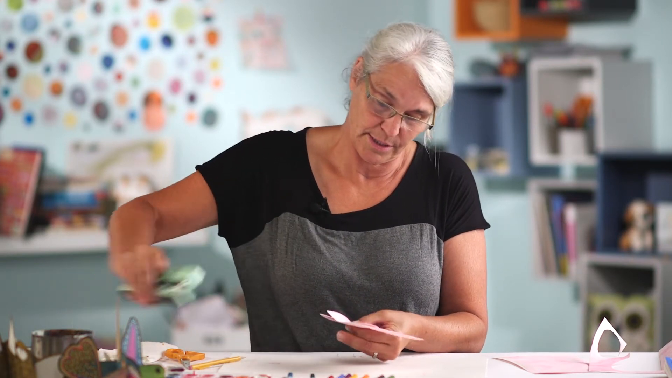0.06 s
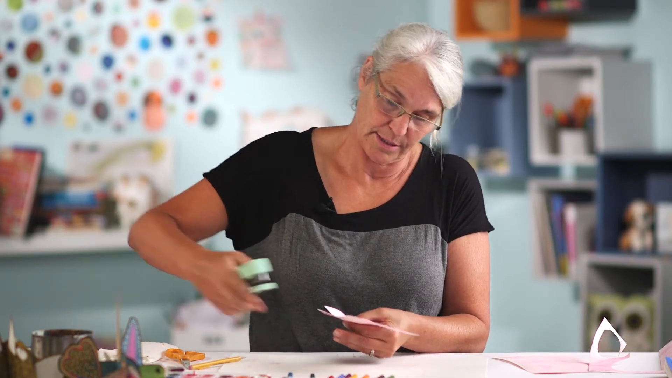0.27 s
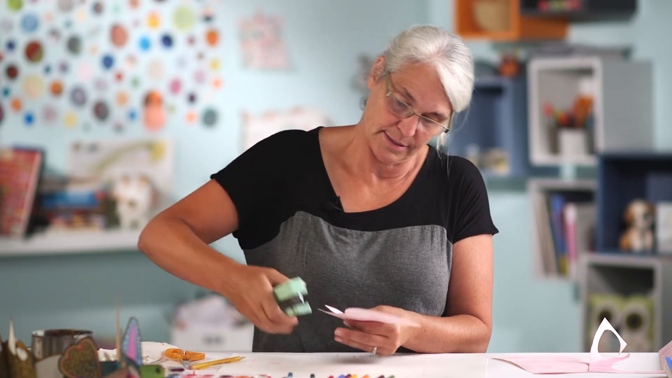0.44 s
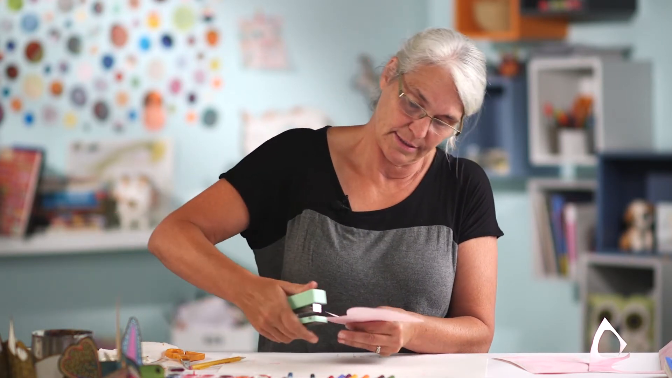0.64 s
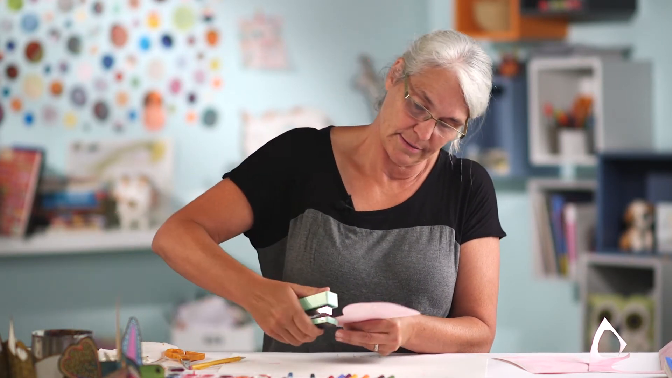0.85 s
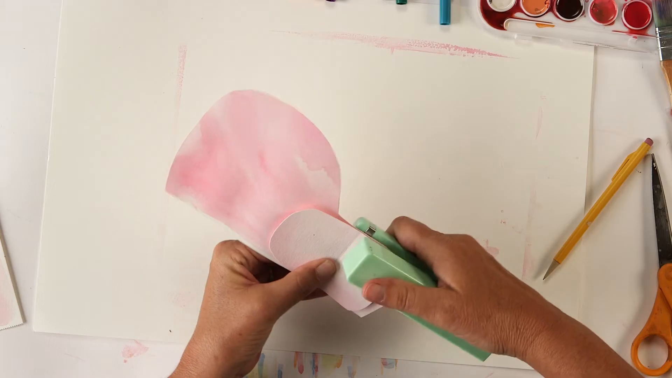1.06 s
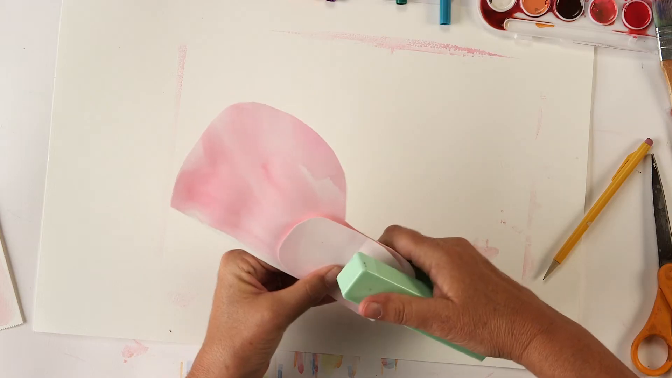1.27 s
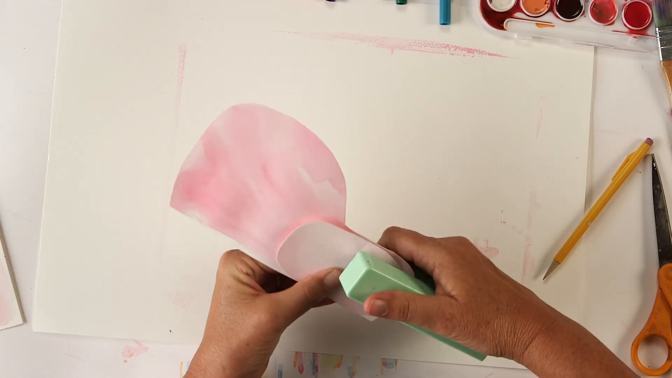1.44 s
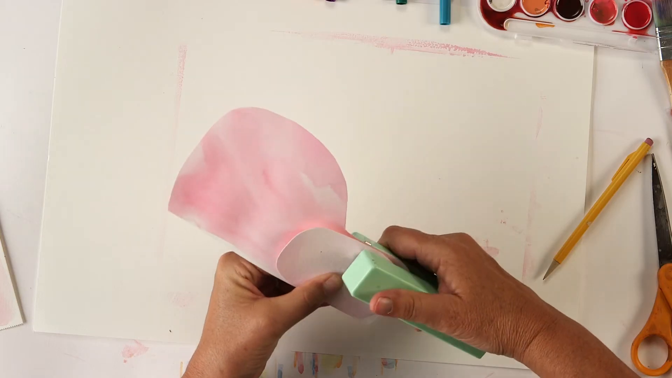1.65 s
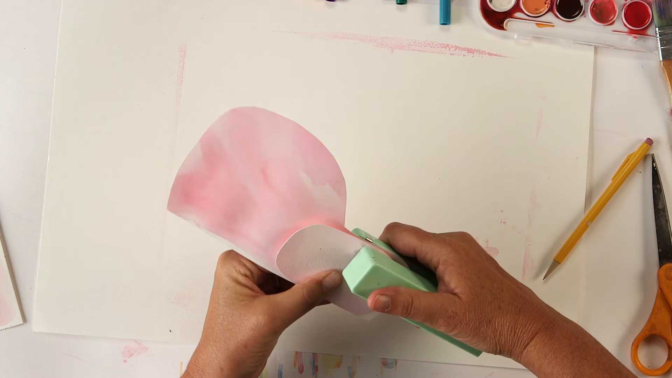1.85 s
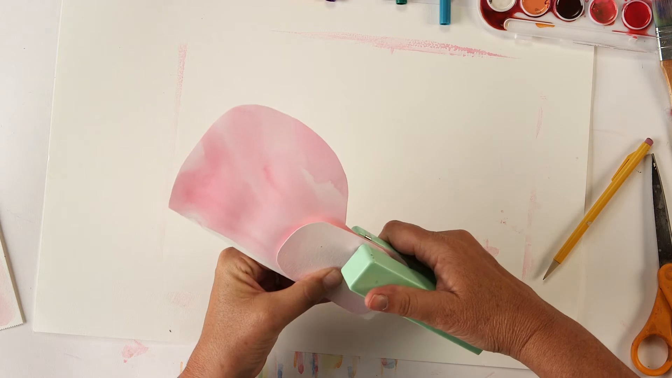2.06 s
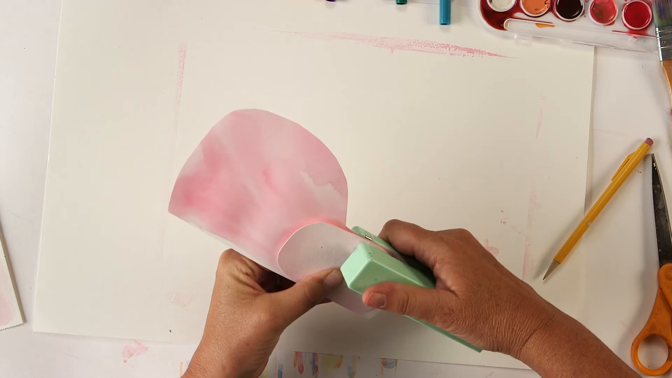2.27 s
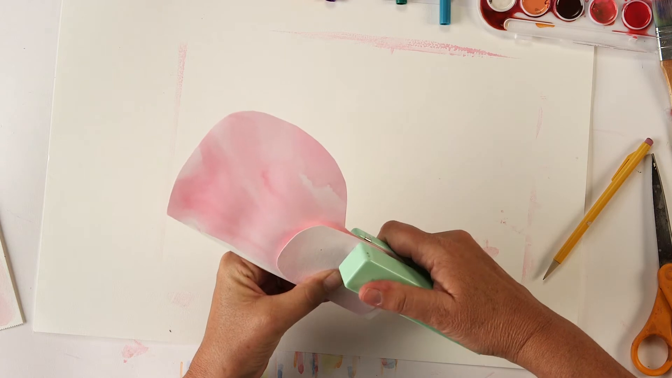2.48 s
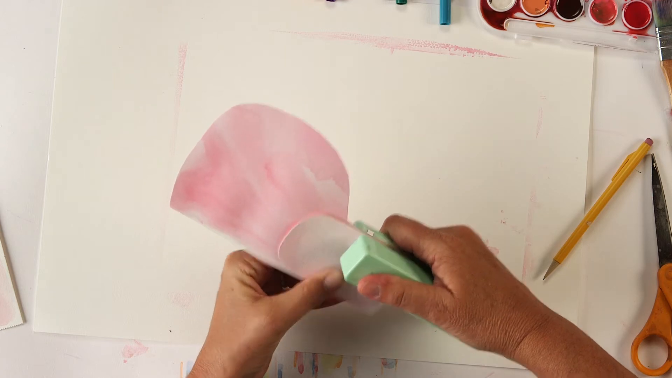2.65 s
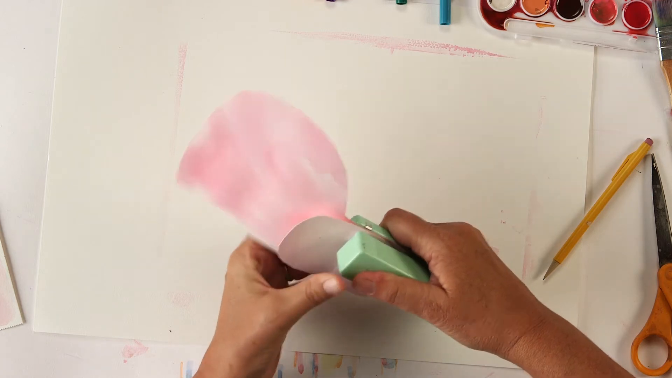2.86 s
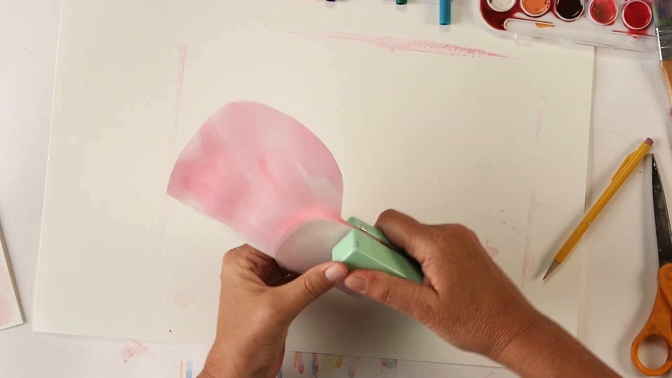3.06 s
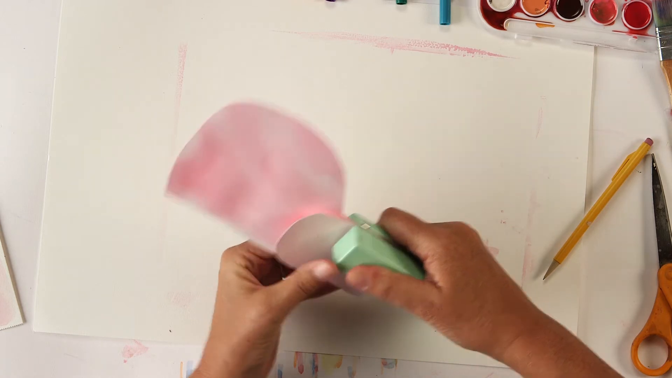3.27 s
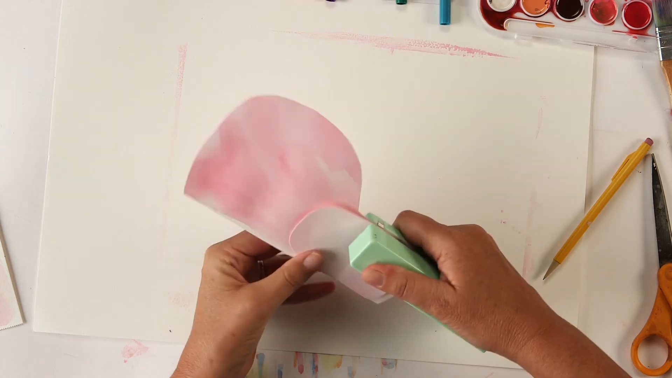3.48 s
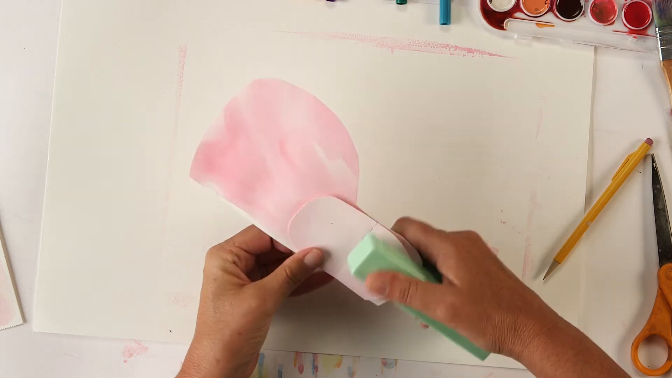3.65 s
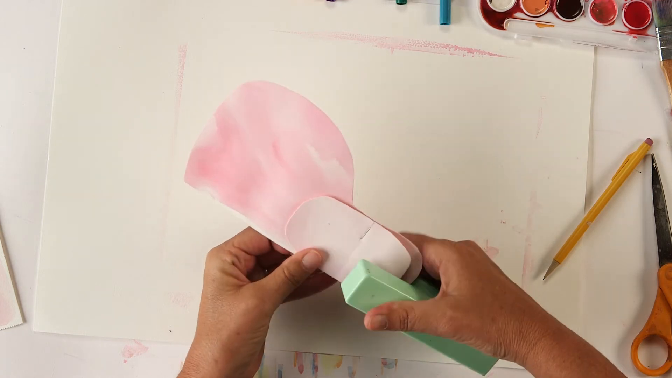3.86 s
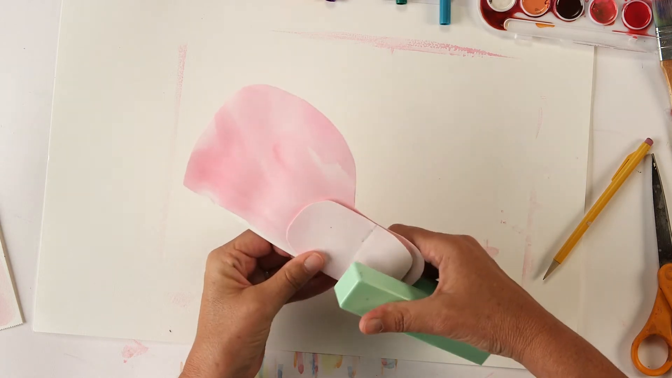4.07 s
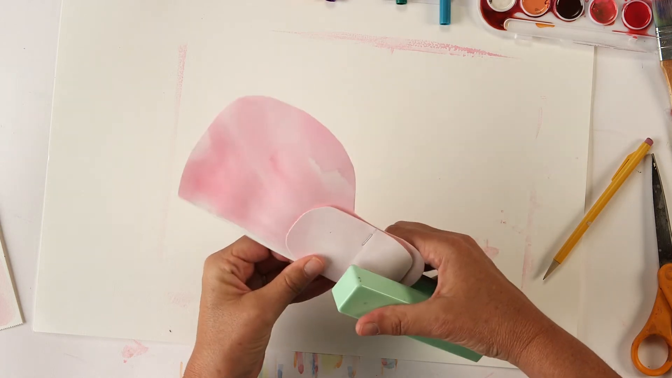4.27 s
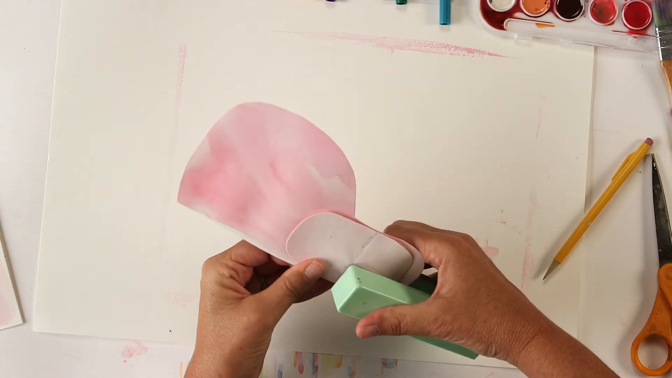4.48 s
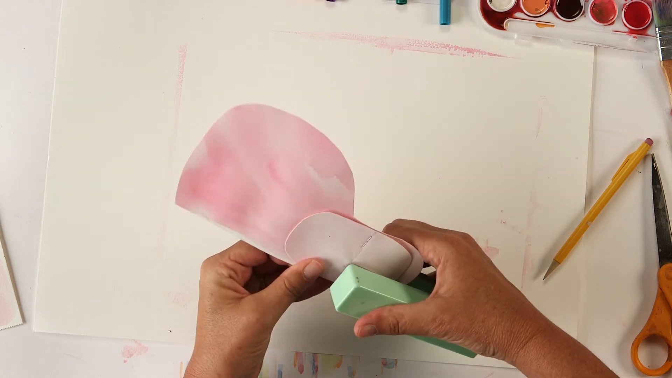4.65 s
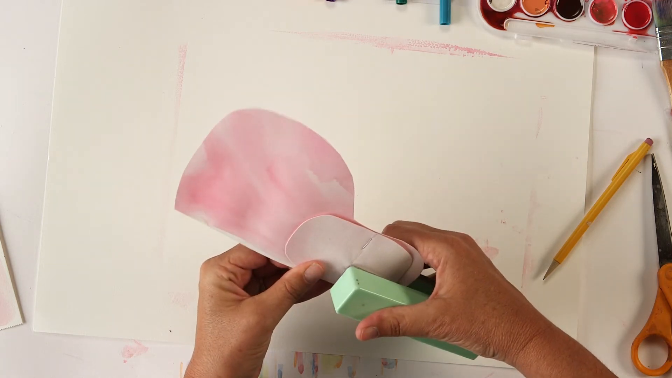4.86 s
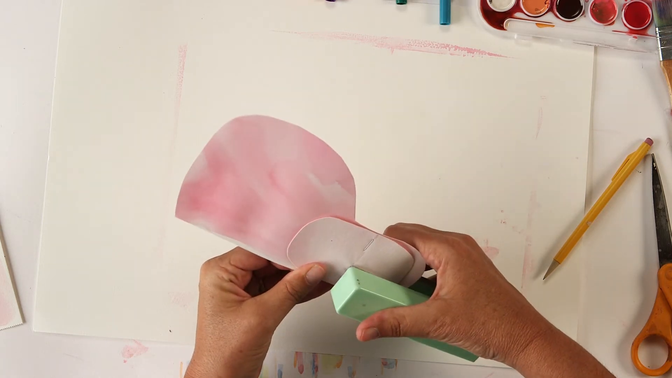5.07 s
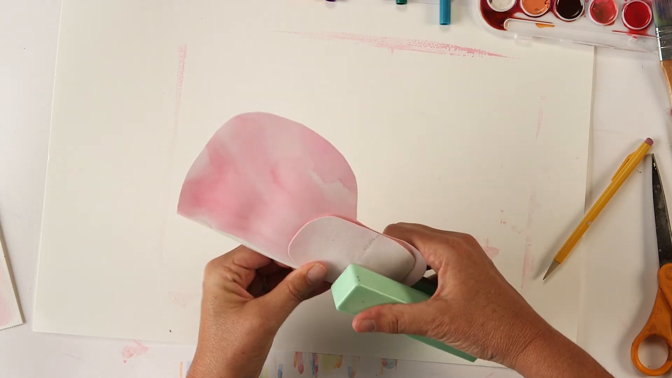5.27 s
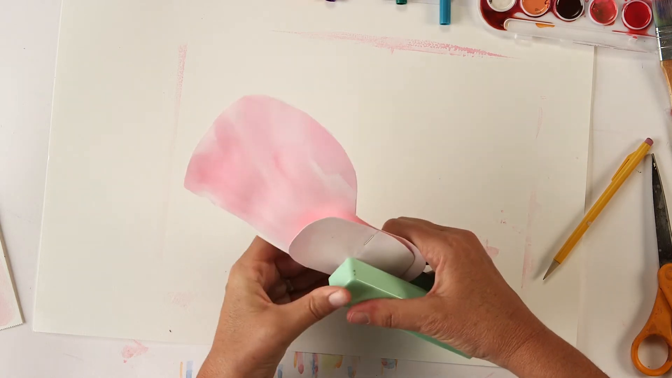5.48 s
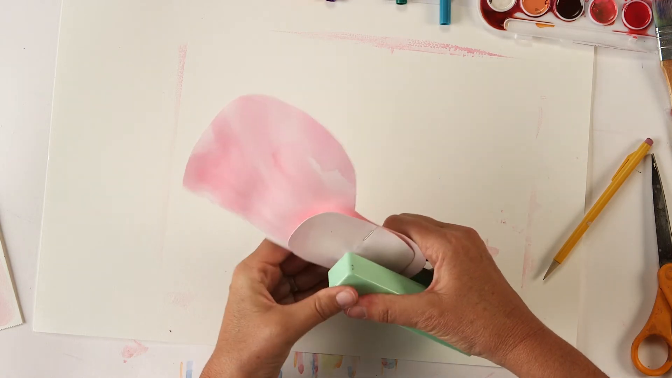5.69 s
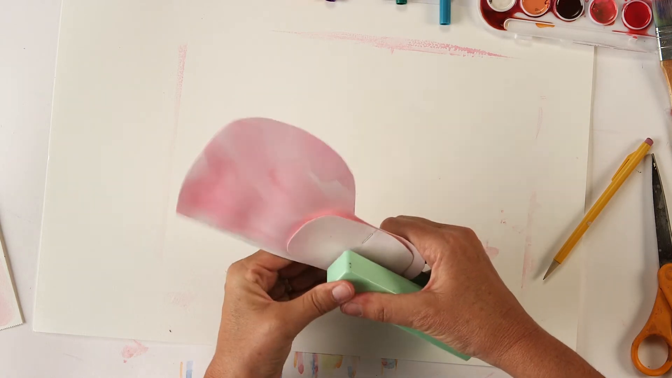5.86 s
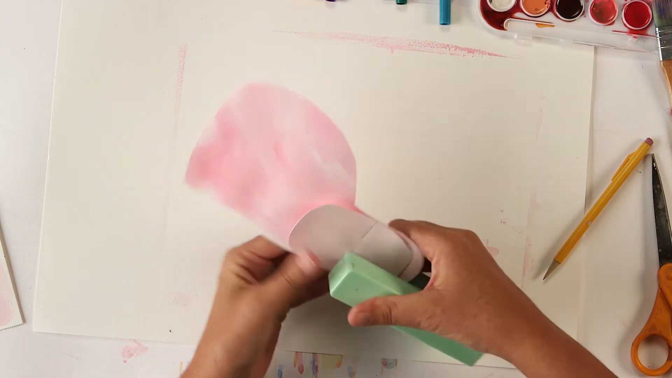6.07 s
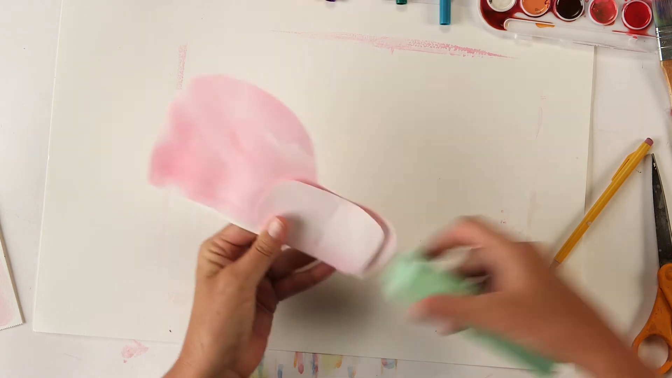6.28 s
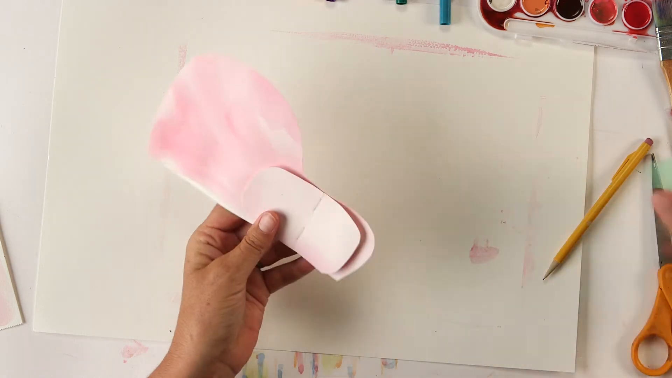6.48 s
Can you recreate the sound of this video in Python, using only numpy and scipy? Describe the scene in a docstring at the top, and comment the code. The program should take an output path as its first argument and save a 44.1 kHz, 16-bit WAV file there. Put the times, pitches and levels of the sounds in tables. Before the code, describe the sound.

A small hand stapler rattles as it is picked up, rubs over folded paper, then clacks hard twice in a small quiet room.

```python
"""A small hand stapler rattles as it is picked up, then slides over folded paper and is squeezed twice.
Each contact is a short push that cracks as noise and rings damped body modes, set in level band by band.
The staple strip shivers as sparse impulses through steel modes; the paper rubs as grainy, coloured noise.
A small quiet room answers with decaying noise; a close clip-on microphone flattens the loudest clacks."""
import sys
import numpy as np
from scipy import signal
from scipy.fft import rfft, irfft, next_fast_len
from scipy.io import wavfile
from scipy.ndimage import map_coordinates

SR = 44100
rng = np.random.default_rng(int(sys.argv[2]) if len(sys.argv) > 2 else 0)


def unload_wav(signal):
    """Save mono or channel-first audio to the path in sys.argv[1] as 16-bit WAV at rate SR, clipped to [-1, 1]."""
    wavfile.write(
        sys.argv[1],
        SR,
        np.round(np.clip(np.atleast_2d(signal).T, -1, 1) * 32767).astype(np.int16),
    )


N = 287752

# knocks of loose steel parts, levels relative: start_s, level_db, brightness_db, part_hz, part_db
KNOCKS = [(0.05, -36, -5, 4580, 6.5), (.121, -36, -7, 1650, -10), (0.129, -39, -2, 2280, 12),
          (.147, -38, -18, 3950, 0), (.159, -37.5, 2, 1550, 14), (.222, -23, -31, 2460, -2),
          (0.253, -29.5, -6, 5160, 7), (0.301, -36.5, -7, 6900, 4), (0.342, -31, -15, 1570, 10),
          (0.349, -22.5, -17, 5460, 14), (.359, -29, 0, 6630, 7), (.433, -31, -12.5, 5340, 15.5),
          (0.454, -43, -15, 2200, -9), (0.516, -43.5, -14, 2930, 0), (.584, -32.5, -3.5, 2760, -6),
          (0.598, -34.5, -16, 2840, 0), (0.876, -40.5, -13, 4050, 9)]
# band edges of a light contact (low, middle, bright): edge_hz
LIGHT_EDGES = [300, 1300, 6000, 15000]
# light contact: time to the peak of the push; ring time of the struck part, damped by the hand
SOFT_CONTACT_S, HELD_T60_S = 0.0007, 0.022


def amp(db):
    """Decibels to gain."""
    return 10 ** (np.asarray(db) / 20)


def unit(x):
    """x at rms 1."""
    return x / np.sqrt(np.mean(x ** 2) + 1e-20)


def along(points, hz):
    """(Hz, value) points joined on a log frequency axis."""
    point_hz, value = np.transpose(points)
    return np.interp(np.log(hz + 1), np.log(point_hz + 1), value)


def filtered(x, response):
    """x times a response of frequency, zero-padded against wrap-around."""
    size = next_fast_len(len(x) + SR // 4)
    hz = np.fft.rfftfreq(size, 1 / SR)
    return irfft(rfft(x, size) * response(hz), size)[:len(x)]


def coloured(x, spectrum):
    """x shaped by (Hz, dB) points, at rms 1."""
    return unit(filtered(x, lambda hz: amp(along(spectrum, hz))))


def wobble(knots_per_s):
    """Smooth random curve: a spline through random knots."""
    knots = rng.standard_normal(int(N * knots_per_s / SR) + 4)
    return map_coordinates(knots, [np.arange(N) * knots_per_s / SR])


def resonance(hz, centre_hz, width_hz):
    """Response of one damped mode, 1 at its centre."""
    return 1j * hz * width_hz / (centre_hz ** 2 - hz * hz + 1j * hz * width_hz)


def add(track, start_s, sound):
    """Mix a sound into the track at start_s."""
    start = round(start_s * SR)
    track[start:start + len(sound)] += sound[:N - start]


def voiced(blow, edges_hz, levels_db):
    """Where a blow lands sets its band levels; a minimum-phase filter keeps the colour from leading it."""
    n = len(blow)
    hz, spectrum = np.fft.rfftfreq(n, 1 / SR), rfft(blow)
    # energy counted as power over 5 ms
    power = 2 * np.abs(spectrum) ** 2 / n / (SR * 0.005)
    tone = []
    for low_hz, high_hz, db in zip(edges_hz, edges_hz[1:], levels_db):
        band_power = power[(hz >= low_hz) & (hz < high_hz)].sum()
        tone.append((np.sqrt(low_hz * high_hz), db - 10 * np.log10(band_power)))
    # fold the cepstrum to its causal half: minimum phase
    cepstrum = irfft(np.log(amp(along(tone, hz))), n)
    cepstrum[1:n // 2] *= 2
    cepstrum[n // 2:] = 0
    return irfft(spectrum * np.exp(rfft(cepstrum)), n)


def strike(contact_s, crack_db, tail_db, tail_t60_s, part_hz, part_db, part_t60_s):
    """A push cracks, rings body modes and the struck part; a fainter noise tail dies away after it."""
    # stapler body modes: centre_hz, width_hz, level_db
    body_modes = [(380, 1400, -6.5), (639, 220, -7), (1033, 330, -13), (1365, 90, -9), (1458, 190, -4.5),
                  (1588, 110, -9.5), (1975, 140, -4.5), (2153, 110, -6), (2745, 160, -7.5), (3168, 150, -5),
                  (4036, 70, -13.5), (4810, 400, -10.5), (5293, 170, -4.5), (6760, 120, -8.5),
                  (7600, 200, -5), (8320, 340, -3), (9580, 290, -8.5)]
    t = np.arange(int(SR * 0.6) // 2 * 2) / SR
    push = t / contact_s * np.exp(1 - t / contact_s)
    onset = 1 - np.exp(-t / contact_s)

    def sine(hz):
        """Sine at random phase, detuned about 1 %."""
        return np.sin(2 * np.pi * (hz * (1 + 0.01 * rng.normal()) * t + rng.random()))

    ring = onset * amp(part_db - 60 * t / part_t60_s) * sine(part_hz)
    for hz, width_hz, db in body_modes:
        # the push charges a leaky mode
        swell = signal.lfilter([1], [1, -np.exp(-np.pi * width_hz / SR)], push + 1e-20)
        ring += amp(db + 0.32 * rng.normal()) * swell / swell.max() * sine(hz)
    noise_level = amp(crack_db) * push + amp(tail_db - 60 * t / tail_t60_s) * onset
    # plastic softens the very top of the noise
    softening = signal.butter(2, 11500, fs=SR)
    noise = signal.lfilter(*softening, rng.standard_normal(len(t)))
    return ring + noise_level * noise


def room(x):
    """Diffuse wall answer: noise builds up within milliseconds and decays at a rate set by frequency."""
    # decay times: centre_hz, t60_s
    decay = [(150, 0.15), (500, .44), (1200, 0.47), (3000, 0.4), (7000, 0.42), (14000, 0.18)]
    # reflected colour: centre_hz, level_db
    wall_colour = [(100, -13), (300, -0.5), (600, -2.5), (780, 2), (1050, 0.5), (1750, -2.5), (3100, -1.5),
                   (6000, -7.5), (14000, -3)]
    hz, t, z = signal.stft(rng.standard_normal(int(SR * 0.6)), SR, nperseg=256)
    buildup = 1 - np.exp(-t / 0.0025)
    fade = amp(-60 * t / along(decay, hz)[:, None]) * buildup
    tail = signal.istft(z * fade, SR, nperseg=256)[1]
    wet = signal.fftconvolve(x, tail / np.linalg.norm(tail))[:len(x)]
    return filtered(wet, lambda f: amp(along(wall_colour, f)))


def still_air():
    """Faint rumble and hiss of the room: steady coloured noise."""
    # relative density: centre_hz, level_db_per_hz
    air_spectrum = [(12, -29.5), (20, 0), (59, -7), (112, -7.5), (175, -12), (464, -22), (505, -19),
                    (667, -23), (1010, -26), (2210, -34.5), (3750, -32.5), (6180, -36.5), (10500, -38),
                    (15500, -41.5)]
    return amp(-56) * coloured(rng.standard_normal(N), air_spectrum)


def paper():
    """Fibres catch and slip: a grainy rub and finer hiss swell and fade with each stroke's speed."""
    # relative densities: centre_hz, level_db_per_hz
    rub_spectrum = [(240, -23), (400, 4.5), (1190, -8.5), (1420, -7), (2090, -3.5), (2620, -7),
                    (4670, -2.5), (8000, -21), (10400, -49), (17600, -120)]
    hiss_spectrum = [(2500, -23), (6000, 4.5), (10000, 3), (15500, -4)]
    # slides under fingers and jaws: start_s, length_s, rub_db, hiss_re_rub_db
    slides = [(0.109, 0.13, -54.5, -5), (1.227, 0.29, -63.5, -4), (1.682, 0.12, -67, 1),
              (2.73, 0.039, -61.5, -2), (2.813, 0.062, -54.5, -7), (2.937, 0.097, -53, -6),
              (3.424, 0.12, -55.5, -0.5), (3.487, 0.18, -55, 0.5), (3.633, 0.066, -53.5, -2),
              (3.685, 0.13, -53, -6), (3.797, 0.09, -55, 2), (3.986, 0.025, -53.5, -3),
              (4.04, 0.22, -67, -3.5), (5.725, 0.057, -62, -4), (6.102, 0.1, -49, 5.5),
              (6.212, 0.16, -53.5, -1.5), (6.308, 0.23, -56, -7.5), (6.487, 0.086, -55, -1)]
    rise_share, fall_share = 0.2, 0.52  # parts of a stroke spent speeding up, slowing down

    def grain(spectrum):
        """Noise under random catches, coloured."""
        noise = rng.standard_normal(N)
        catches = amp(3.5 * wobble(500) + 2 * wobble(60) + 1.5 * wobble(18))
        return coloured(noise * catches, spectrum)

    out, t = np.zeros(N), np.arange(N) / SR
    rub, hiss = grain(rub_spectrum), grain(hiss_spectrum)
    for start_s, length_s, rub_db, hiss_re_rub_db in slides:
        u = (t - start_s) / length_s
        speed = np.clip(np.minimum(u / rise_share, (1 - u) / fall_share), 0, 1)
        out += amp(rub_db) * speed * (rub + amp(hiss_re_rub_db) * hiss)
    return out


def jingle(contacts_per_s=500):
    """Each knock shivers the staple strip in its rail: many tiny contacts ring the steel and die away."""
    # loose staples and steel rail: centre_hz, width_hz, level_db
    steel_modes = [(1604, 61, 11.5), (1930, 200, 4), (2870, 240, -3), (5300, 280, -3), (6550, 260, -6),
                   (11100, 900, -5), (13000, 900, -1)]
    jingle_re_knock_db, jingle_t60_s = -27.5, 0.31
    t = np.arange(N) / SR
    contacts = (rng.random(N) < contacts_per_s / SR) * rng.standard_normal(N)

    def steel_response(hz):
        """Sum of the steel modes."""
        return sum(amp(db) * resonance(hz, centre_hz, width_hz) for centre_hz, width_hz, db in steel_modes)

    steel = filtered(contacts, steel_response)
    energy = np.zeros(N)
    for start_s, level_db, *_ in KNOCKS:
        # abs keeps the gain finite ahead of the knock
        fade_db = -60 * np.abs(t - start_s) / jingle_t60_s
        energy += (t > start_s) * amp(level_db + jingle_re_knock_db + fade_db) ** 2
    shaken = unit(steel) * np.sqrt(energy)
    return shaken + amp(-6) * room(shaken)


def taps():
    """Light, short contacts as the stapler shifts in the hand and its jaws and shell meet the paper."""
    # levels relative: start_s, level_db, brightness_db, part_hz, part_db
    contacts = [(.635, -44.5, -19, 970, 8), (0.973, -45, -1, 3350, 4), (.992, -36, -2.5, 590, 2),
                (1.1, -49, 0, 4370, 7), (2.294, -37, -8.5, 2100, -11), (2.311, -33, -4, 2070, -2),
                (2.749, -45.5, 0.5, 5250, -12), (2.832, -44.5, -2, 4600, -10),
                (3.349, -35.5, -9.5, 4570, 0), (3.525, -47, -12, 1270, -9), (3.577, -46, 4, 6570, -7),
                (3.665, -27, 3, 3840, -1), (3.799, -33, -16.5, 2970, -3), (4.009, -36.5, -2.5, 4670, -7),
                (4.805, -44.5, -11.5, 1560, 2), (5.193, -39.5, -18.5, 1563, 2),
                (5.226, -37, -20.5, 1544, 1.5), (5.807, -38, -4.5, 3000, -12), (6.095, -38, -2, 2950, -4.5),
                (6.1, -29.5, -3.5, 2670, -5), (6.216, -27, -10, 4870, 10), (6.224, -32, -5, 4600, 6),
                (6.273, -37, -2.5, 4650, -4), (6.28, -34, -7, 3900, -13)]
    low_db = -2.5  # more body than a rattle
    out = np.zeros(N)
    for start_s, level_db, bright_db, part_hz, part_db in contacts:
        blow = strike(SOFT_CONTACT_S, crack_db=14.5, tail_db=-10, tail_t60_s=0.3,
                      part_hz=part_hz, part_db=part_db + 10.5, part_t60_s=HELD_T60_S)
        levels_db = level_db + np.array([low_db, 0, bright_db])
        add(out, start_s, amp(-7) * voiced(blow, LIGHT_EDGES, levels_db))
    return out + amp(-11.5) * room(out)


def rattles():
    """Loose steel parts knock and ping as the stapler is lifted and turned."""
    low_db = -21  # little body
    out = np.zeros(N)
    for start_s, level_db, bright_db, part_hz, part_db in KNOCKS:
        blow = strike(SOFT_CONTACT_S, crack_db=15.5, tail_db=-7.5, tail_t60_s=0.37,
                      part_hz=part_hz, part_db=part_db + 10.5, part_t60_s=HELD_T60_S)
        levels_db = level_db + np.array([low_db, 0, bright_db])
        add(out, start_s, amp(-5.5) * voiced(blow, LIGHT_EDGES, levels_db))
    return out + amp(-11.5) * room(out)


def clacks():
    """The arm closes, drives the staple and springs back; the walls get sound from all its sides."""
    # stapler blows, levels relative: start_s, level_db, thud_db, knock_db, hollow_db, snap_db (bands
    # against level_db), contact_s, room_db, part_hz, part_db
    blows = [(0.5398, -24, -26, -9.5, -18, -19, 0.00046, -16, 830, 14),
             (2.461, -9, -2.5, -12.5, -9.5, -2, .0012, -17, 5250, 10),
             (3.162, -3, -7.5, -3, -2, -2, .0013, -15, 1198, 5.5),
             (3.668, -24, -30, -9, 0.5, 1.5, 0.0013, -18.5, 860, 8),
             (4.869, -35.5, -18, -6, 5.5, 1, 0.0012, -16.5, 1550, 5.5),
             (5.3855, -11, -18.5, -4.5, -11.5, -11, .0014, -14.5, 2310, 6.5),
             (5.818, -15, -26.5, -8, -20, -13.5, .00092, -14.5, 2316, -14),
             (5.893, -1.5, -13.5, -5.5, -5.5, -3.5, 0.0015, -14.5, 1956, -2.5),
             (6.135, -18.5, -46, -6, -4, 2.5, 0.0014, -14.5, 4810, 6)]
    # edges of the bands thud, knock, hollow ring, shell, rail, snap: edge_hz
    blow_edges = [70, 250, 850, 1400, 2500, 6000, 15000]
    # steel arm and spring, sounding into the room: centre_hz, width_hz, level_db
    spring_modes = [(612, 42, 2.5), (1160, 130, 3.5), (1440, 130, 5.5), (2100, 210, 6), (2320, 90, 5),
                    (2680, 120, 0.5), (3120, 150, 10), (3780, 72, 7), (4410, 200, 1.5), (5210, 200, 8),
                    (6740, 200, 1), (7300, 300, 4), (7800, 200, 3.5)]
    shell_db, rail_db = 1, -1  # plastic shell and steel rail, against the level of every blow

    def steel_response(hz):
        """Even crack with the steel modes standing out of it."""
        return 1 + sum(amp(db) * resonance(hz, centre_hz, width_hz)
                       for centre_hz, width_hz, db in spring_modes)

    out = np.zeros(N)
    spread = filtered(signal.unit_impulse(SR // 4 * 2), steel_response)
    for (start_s, level_db, thud_db, knock_db, hollow_db, snap_db,
         contact_s, room_db, part_hz, part_db) in blows:
        levels_db = level_db + np.array([thud_db, knock_db, hollow_db, shell_db, rail_db, snap_db])
        near = strike(contact_s, crack_db=6, tail_db=-11.5, tail_t60_s=0.14,
                      part_hz=part_hz, part_db=part_db + 2.5, part_t60_s=0.011)
        add(out, start_s, amp(-1) * voiced(near, blow_edges, levels_db))

        def part_response(hz):
            """The struck part standing out of the room sound."""
            return 1 + amp(part_db - 5.5) * resonance(hz, part_hz, 150 + 0.055 * part_hz)

        wet = room(voiced(spread, blow_edges, levels_db))
        add(out, start_s, amp(room_db) * filtered(wet, part_response))
    return out


def scene():
    """Stapler and paper over the still room, one channel."""
    return (still_air() + paper() + jingle() + taps() + rattles() + clacks())[None]


def overload(x, top, hardness):
    """Peaks flatten against the top."""
    return x / (1 + np.abs(x / top) ** hardness) ** (1 / hardness)


def thump(x, centre_hz, width_hz):
    """The microphone swings lopsidedly on sharp peaks and settles with a slow, low bump."""
    return filtered(np.abs(x), lambda hz: resonance(hz, centre_hz, width_hz))


def record(dry):
    """The microphone overloads and thumps; a steep low-pass leaves nothing above about 15.6 kHz."""
    low_pass_hz = 15650
    x = overload(dry[0], top=1.0, hardness=6)
    swing = overload(x, top=0.33, hardness=2)
    x = x + amp(-2) * thump(swing, centre_hz=35.8, width_hz=30)
    return filtered(x, lambda hz: 1 / np.sqrt(1 + (hz / low_pass_hz) ** 120))[None]


dry = scene()
out = record(dry)
unload_wav(out)
```